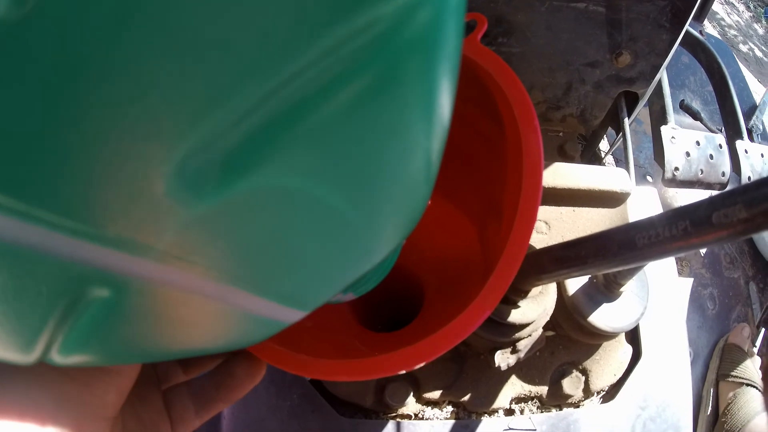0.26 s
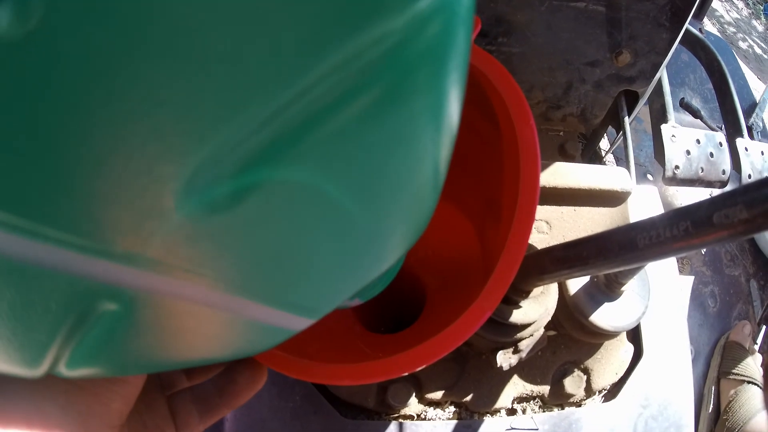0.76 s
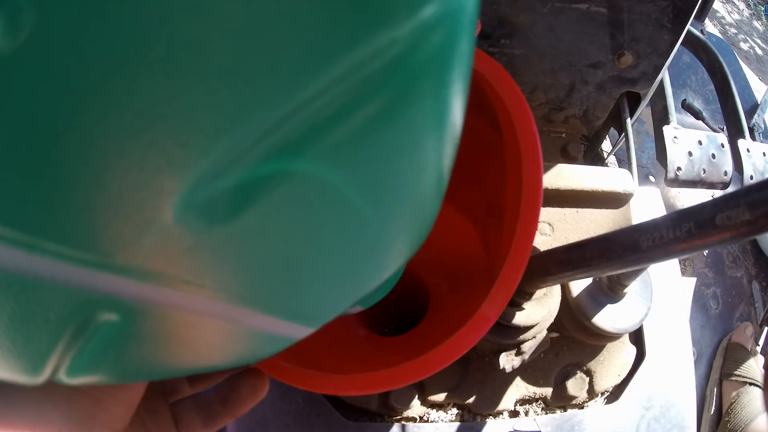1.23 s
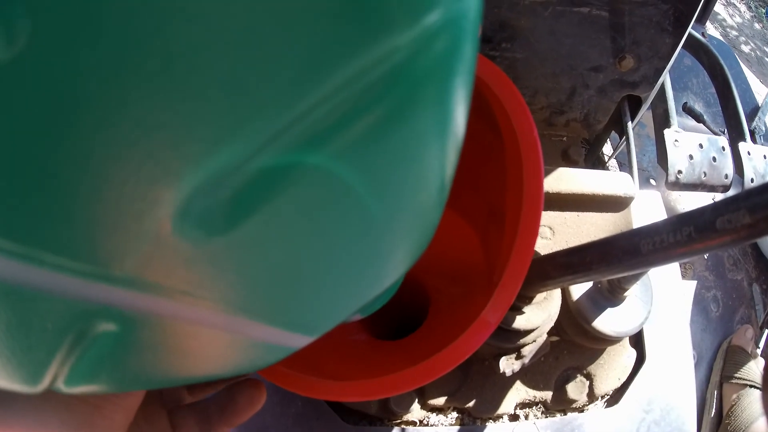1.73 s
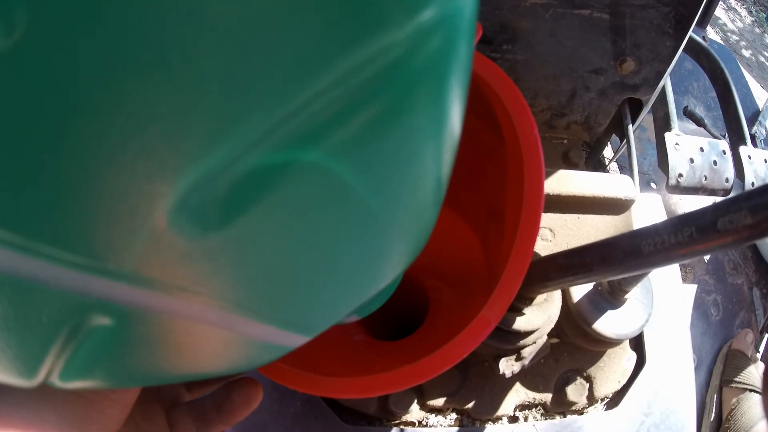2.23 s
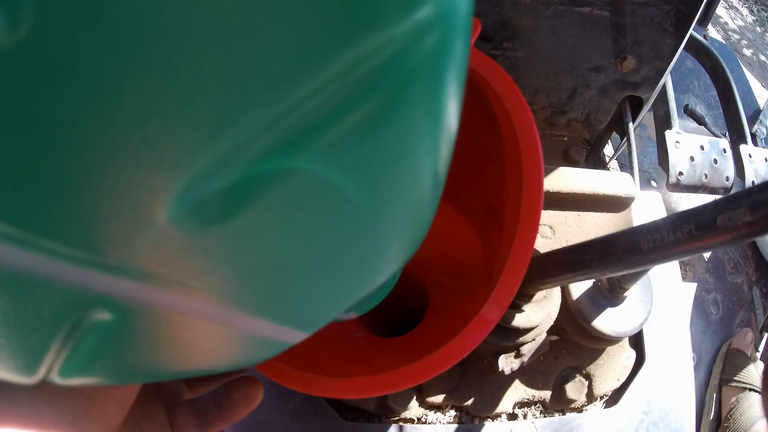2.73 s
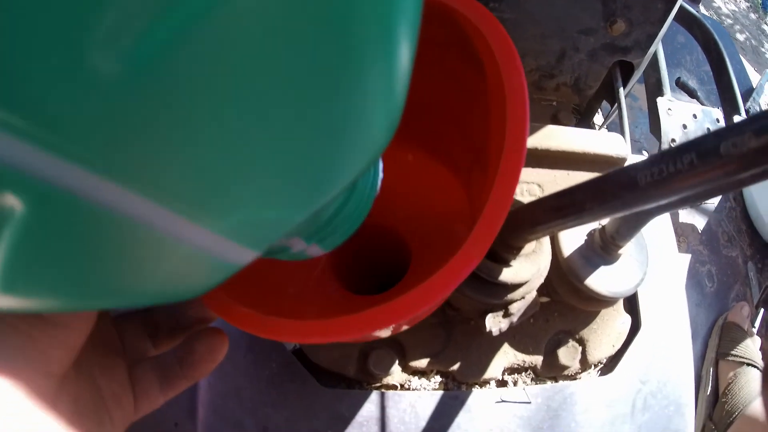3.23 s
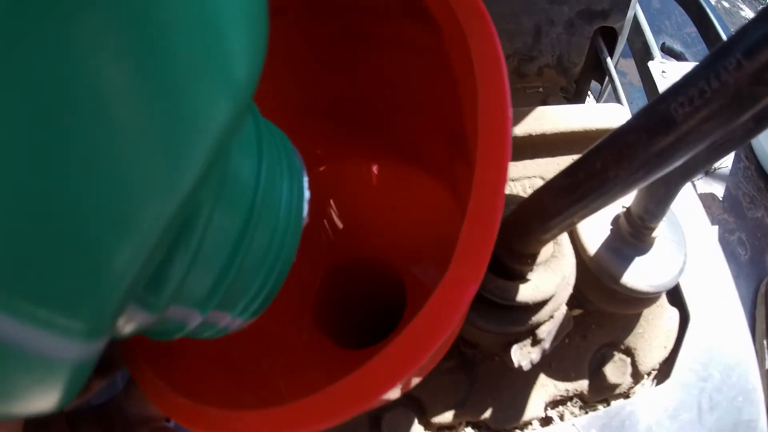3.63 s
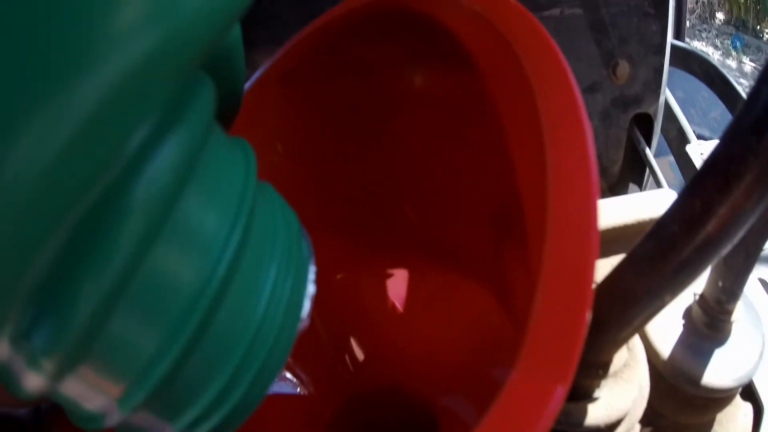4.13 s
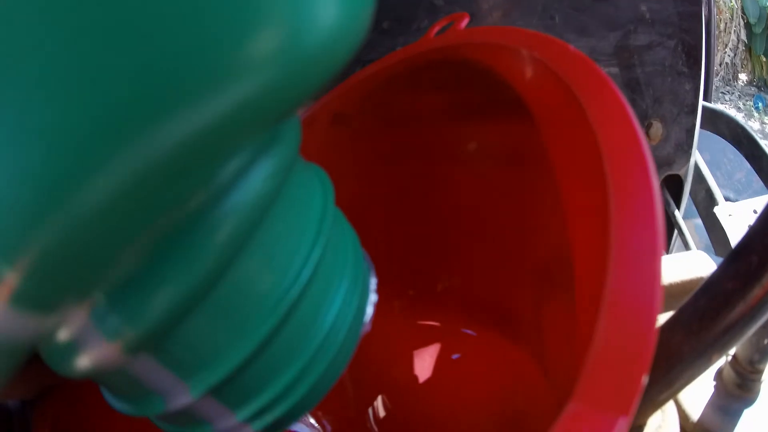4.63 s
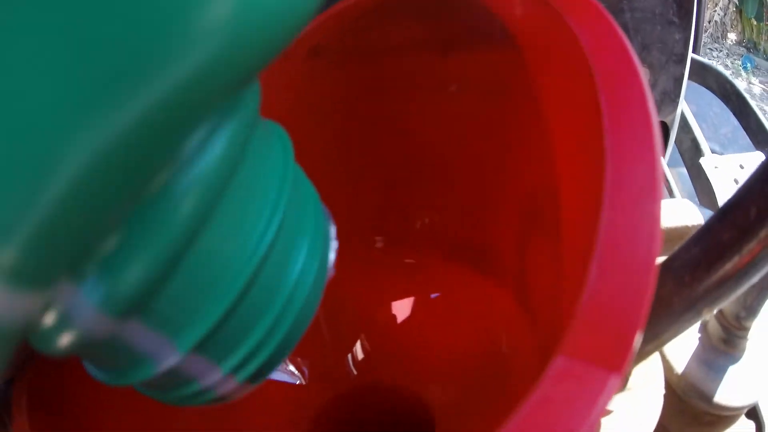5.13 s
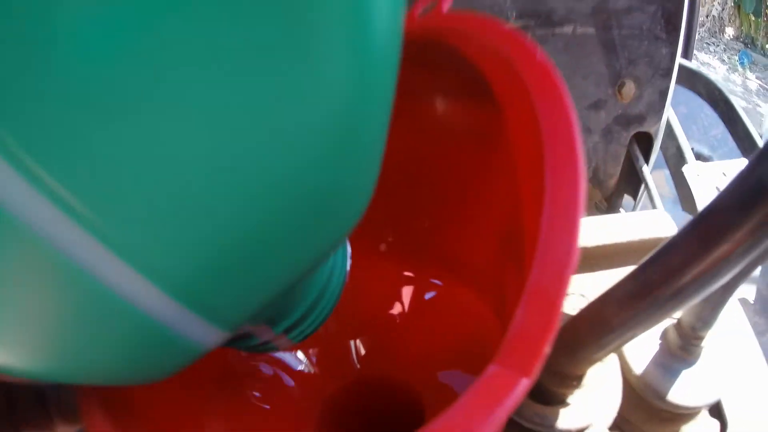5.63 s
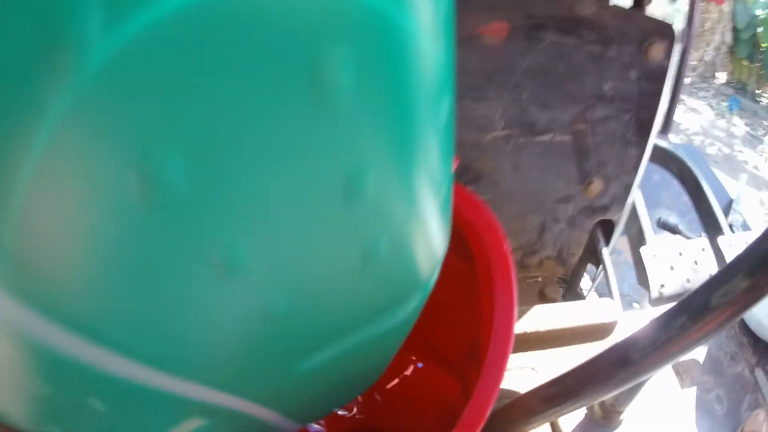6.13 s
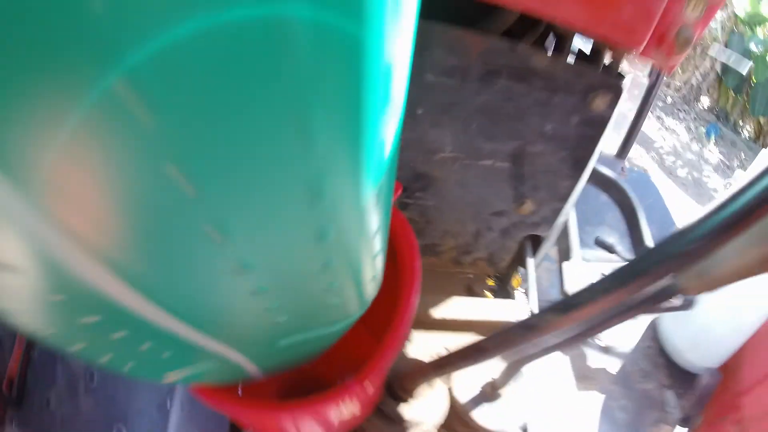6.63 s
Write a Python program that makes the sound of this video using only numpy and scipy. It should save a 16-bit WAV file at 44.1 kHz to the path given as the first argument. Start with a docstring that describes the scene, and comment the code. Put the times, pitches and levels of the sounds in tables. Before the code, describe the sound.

A plastic jug pops once, taps and rubs on a plastic funnel, then glugs oil and slides juddering along the rim.

```python
"""Outdoors at a farm machine, one microphone close by: oil is poured from a big plastic jug into a funnel.
The jug's wall pops once and rings. As the jug is tipped it bumps, taps and rubs on the plastic funnel,
ticks as it flexes and rumbles in the hands, and air glugs in at the neck.
At the end it clacks against the rim and slides along it with a hiss and a stick-slip judder.
Behind it all lie a faint rumble of open air, an even hiss and a thin whine that comes and goes."""
import sys
import numpy as np
from scipy import signal
from scipy.fft import rfft, irfft
from scipy.io import wavfile
from scipy.ndimage import uniform_filter1d

SR = 44100
rng = np.random.default_rng(int(sys.argv[2]) if len(sys.argv) > 2 else 0)


def to_wav(sig):
    """Store sig (one row per channel, or 1-D mono) as 16-bit WAV at the path in sys.argv[1].

    Samples outside -1..1 are clipped; the rate is SR.
    """
    pcm = np.clip(np.atleast_2d(sig), -1, 1) * 32767
    pcm = np.round(pcm).astype(np.int16)
    wavfile.write(sys.argv[1], SR, pcm.T)  # frames by channels


N = 302967
TIME = np.arange(N) / SR   # seconds into the scene
AGE = np.arange(SR) / SR   # seconds since a blow


def amp(db):
    """Decibels to gain."""
    return 10 ** (np.asarray(db) / 20)


def rms_one(x):
    """Scale to unit power."""
    return x / np.sqrt(np.mean(x ** 2) + 1e-20)


def peak_one(x):
    """Scale so that the loudest few milliseconds have unit power."""
    return x / np.sqrt(uniform_filter1d(x ** 2, size=256).max() + 1e-20)


def at_hz(table, hz, column=1):
    """Read a column of a table on a log-frequency axis."""
    table = np.array(table)
    return np.interp(np.log(hz + 1e-9), np.log(table[:, 0]), table[:, column])


def fade(t60):
    """An exponential decay that loses 60 dB in t60 seconds."""
    return np.exp(-np.log(1000) * AGE / max(t60, 1e-3))


def swell(rise_s):
    """A soft contact takes a moment to build up."""
    return 1 - np.exp(-(AGE / max(rise_s, 1e-4)) ** 2)


def add(track, s, sound):
    """Mix a sound into a track at a time in seconds."""
    at = int(round(s * SR))
    track[at:at + len(sound)] += sound[:N - at]


def drift(per_s):
    """A random wander of unit power."""
    knots = rng.standard_normal(int(N / SR * per_s) + 2)
    return rms_one(np.interp(TIME * per_s, np.arange(len(knots)), knots))


def coloured(x, spectrum):
    """Give a signal a spectrum that falls away beyond its ends; unit power."""
    hz = np.arange(len(x) // 2 + 1) * SR / len(x) + 1e-3
    ends = (1 + (spectrum[0][0] / hz) ** 8) * (1 + (hz / spectrum[-1][0]) ** 24)
    return rms_one(irfft(rfft(x) * amp(at_hz(spectrum, hz)) / np.sqrt(ends), len(x)))


def noise_burst(spectrum, t60, rise_s):
    """Coloured noise that builds up and dies away."""
    noise = coloured(rng.standard_normal(len(AGE)), spectrum)
    return peak_one(noise * fade(t60) * swell(rise_s))


def grains(per_s, spread_db):
    """Tiny catches of two surfaces, random in time and size."""
    sizes = amp(spread_db * np.minimum(rng.exponential(1, N), 4)) * rng.choice([-1, 1], N)
    return sizes * (rng.random(N) < per_s / SR)


def stroke(start, end, attack_s, release_s, growth_db_per_s):
    """The gain of one stroke: a soft attack, a hold that grows steadily, a dying release."""
    attack = 0.5 + 0.5 * np.tanh(2 * (TIME - start) / attack_s)
    release = np.exp(-np.maximum(TIME - end, 0) / release_s)
    from_middle_s = np.clip(TIME, start, end) - (start + end) / 2
    return attack * release * amp(growth_db_per_s * from_middle_s)


def favour_db(hz, centre_hz, slope_db):
    """The place and softness of a contact tilt the modes: slope_db less per octave from one pitch."""
    return -slope_db * np.abs(np.log2(hz / centre_hz))


def modal_ring(modes, vary_db, build_cycles):
    """Damped sines, varied on every blow; each builds up over its cycles, so the lows come last."""
    chance_db = rng.normal(0, vary_db, len(modes))
    out = 0
    for k, (hz, db, t60) in enumerate(modes):
        tone = (-1) ** k * amp(db + chance_db[k]) * np.sin(2 * np.pi * hz * AGE)
        out = out + tone * fade(t60) * swell(build_cycles / hz)
    return peak_one(out)


def dense_ring(table, centre_hz, slope_db):
    """Countless overlapping modes: half-octave bands of noise, each dying at its own rate."""
    edges_hz = np.geomspace(45, 17000, 18)
    white = rng.standard_normal((2, len(AGE)))
    out = 0
    for k, (low, high) in enumerate(zip(edges_hz, edges_hz[1:])):
        hz = np.sqrt(low * high)
        dying = white[k % 2] * fade(at_hz(table, hz, column=2))
        band = signal.sosfilt(signal.butter(2, [low, high], "band", fs=SR, output="sos"), dying)
        out = out + band * amp(at_hz(table, hz) + favour_db(hz, centre_hz, slope_db))
    return peak_one(out)


def blow(modes, ring, centre_hz, slope_db, dense_db, rise_s):
    """One blow on a plastic body: its clear modes and its dense ring."""
    struck = [(hz, db + favour_db(hz, centre_hz, slope_db), t60) for hz, db, t60 in modes]
    clear = modal_ring(struck, vary_db=3, build_cycles=0.88)
    dense = amp(dense_db) * dense_ring(ring, centre_hz, slope_db)
    return peak_one(swell(rise_s) * (clear + dense))


# Still air around the machine, and a fine hiss: (frequency [Hz], density [dB])
AIR_SPECTRUM = [(15, -31), (25, -12), (59, 2.5), (240, -6.5), (356, -7.5), (493, -13), (537, -15),
                (626, -12), (769, -16), (1500, -21.5), (1950, -35), (3300, -120)]
HISS_SPECTRUM = [(880, -27), (1500, -13), (1640, 0), (4230, -0.5), (6620, 0.5), (9420, -1.5), (11400, 2.5),
                 (12050, 2.5), (12280, 6), (12550, 0.5), (14000, -1.5), (16500, -7.5)]
def background():
    """A faint outdoor rumble under an even hiss."""
    air = amp(-54.5 + 0.12 * drift(per_s=13)) * coloured(rng.standard_normal(N), AIR_SPECTRUM)
    hiss = amp(-59) * coloured(rng.standard_normal(N), HISS_SPECTRUM)
    return air + hiss


# The oil-laden jug's clear modes: (frequency [Hz], level [dB], t60 [s])
LADEN_JUG_MODES = [(121, 12, 0.093), (176, 7, 0.38), (224.6, 0, 0.16), (318, -7, 0.056), (355.5, 1, 0.22),
                   (476, -5.5, 0.096), (546, -19, 0.24), (657, 5.5, 0.095), (736, 9, 0.034),
                   (910, -39, 0.042)]
# Its dense ring: (frequency [Hz], density [dB], t60 [s])
LADEN_JUG_RING = [(49.7, -15, 0.14), (105, 14, 0.054), (215, 8.5, 0.059), (507, -6.5, 0.18),
                  (794, -11, 0.13), (1100, -16.5, 0.075), (2000, -28, 0.064), (5000, -61, .04),
                  (14000, -28, .03)]
# Jug against funnel, close by: (time [s], level [dB], favoured pitch [Hz], weight [1 = a full bump])
JUG_BUMPS = [(0.047, -40, 108, 0.62), (1.553, -42.5, 138, 1.4), (3.046, -35, 487, 0.23),
             (3.050, -35.5, 30, 0.36), (4.129, -23, 240, 0.83), (4.162, -23, 480, 0.53),
             (4.171, -23, 423, 0.98), (4.234, -27, 523, 0.2), (4.274, -31, 300, 1.2),
             (5.110, -32.5, 350, 0.72), (5.189, -29.5, 199, 0.63), (5.272, -28.5, 269, 0.81),
             (5.961, -23, 510, 1.46), (6.031, -24.5, 478, 1.37), (6.087, -32.5, 350, 1.3),
             (6.301, -29.5, 443, 0.86)]
def bumps():
    """Dull bumps shake the jug; glancing ones ring shorter, weighty ones set the air inside booming."""
    cavity_hz = 65.13
    boom = np.sin(2 * np.pi * cavity_hz * AGE) * fade(t60=0.64) * swell(rise_s=0.015)
    out = np.zeros(N)
    for s, db, pitch_hz, weight in JUG_BUMPS:
        modes = [(hz, level_db, t60 * weight) for hz, level_db, t60 in LADEN_JUG_MODES]
        ring = [(hz, level_db, t60 * weight) for hz, level_db, t60 in LADEN_JUG_RING]
        knock = blow(modes, ring, pitch_hz, slope_db=4.5, dense_db=4, rise_s=0.0017)
        mouth_faces_microphone = 3.0 < s < 5.5
        boom_gain = amp(3 if mouth_faces_microphone else -19) * weight ** 1.96
        add(out, s, amp(db) * (knock + boom_gain * boom))
    return out


# The taut wall's clear modes: (frequency [Hz], level [dB], t60 [s])
TAUT_WALL_MODES = [(137, -10.5, 0.85), (172.7, 0, 0.52), (192, -6, 1), (267, 0, 0.13), (317, -9.5, 0.39),
                   (339, -15, 0.66), (416, -7, .35), (444, -7, 0.63), (516, -4, 0.24), (594, -9, 0.69),
                   (675, 5.5, 0.12), (705, -8.5, 0.64), (743, 6, 0.086), (1201, -12, 0.2), (1700, -19, 0.3),
                   (2450, -15.5, 0.21), (2820, -16.5, 0.15), (3408, -27, 0.2), (4110, -19, 0.13)]
# The dense ring between them: (frequency [Hz], density [dB], t60 [s])
TAUT_WALL_RING = [(60, -34, 0.54), (142, 2, 2.9), (250, -8.5, 0.56), (460, -3.5, 2.06), (696, -9, 2.1),
                  (900, -5.5, 0.21), (2020, -11, 0.19), (2950, -1.5, 0.053), (4970, -18, 0.094),
                  (14000, -19.5, 0.056)]
# The one pop, near the microphone: (time [s], level [dB])
WALL_POP = [(0.392, -18)]
def wall_pop():
    """The wall snaps through and the hollow jug rings on."""
    out = np.zeros(N)
    for s, db in WALL_POP:
        pop = blow(TAUT_WALL_MODES, TAUT_WALL_RING, 700, slope_db=-0.96, dense_db=-8, rise_s=0.00059)
        add(out, s, amp(db - 8) * pop)
    return out


# A faint whine in the background: (start [s], end [s], frequency [Hz], level [dB])
WHINE_TONES = [(0.56, 1.0, 5865, -66), (0.56, 1.0, 11050, -71), (1.0, 1.7, 4700, -72),
               (2.39, 2.61, 4700, -72), (4.08, 4.18, 5865, -67), (5.47, 5.8, 5865, -66),
               (5.47, 5.8, 11050, -71)]
def whine():
    """Thin steady tones switch on and off, barely above the hiss."""
    out = np.zeros(N)
    for start, end, hz, db in WHINE_TONES:
        gate = uniform_filter1d(1.0 * ((TIME > start) & (TIME < end)), size=1024)
        out += amp(db - 1) * np.sin(2 * np.pi * hz * TIME) * gate
    return out


# The plastic's modes under a light touch: (frequency [Hz], level [dB])
TOUCH_MODES = [(310, 9.5), (430, -6.5), (600, 1), (690, 3), (810, -6.5), (1010, -10), (1200, -12.5),
               (1500, -13), (2400, -23)]
# Neck and fingers tapping, close by: (time [s], level [dB], favoured pitch [Hz])
LIGHT_TAPS = [(0.915, -31, 675), (1.103, -35.5, 643), (1.302, -33, 393), (1.321, -33, 401),
              (1.412, -29, 680), (1.554, -32.5, 745), (1.749, -35.5, 678), (2.946, -36, 402),
              (3.075, -27, 420), (3.303, -33.5, 810), (3.352, -34.5, 430), (3.746, -26, 674),
              (3.894, -35.5, 689), (3.949, -23, 647), (4.275, -31, 700), (4.369, -32, 730),
              (4.765, -34, 704), (5.186, -20.5, 700)]
def taps():
    """Light, well damped touches, each with a short scuff in the contact."""
    usual_t60_s, usual_db, usual_hz = 0.056, -32.5, 680
    out = np.zeros(N)
    for s, db, pitch_hz in LIGHT_TAPS:
        # firmer touches, and softer, lower ones, damp the ring sooner
        t60 = usual_t60_s * amp(usual_db - db) ** 0.51 * (pitch_hz / usual_hz) ** 2
        favoured = [(hz, level + favour_db(hz, pitch_hz, slope_db=7.5)) for hz, level in TOUCH_MODES]
        ring = modal_ring([(hz, level, t60) for hz, level in favoured], vary_db=5.5, build_cycles=1.25)
        scuff = noise_burst(favoured, t60, rise_s=0.0017)
        add(out, s, amp(db - 11.5) * peak_one(ring + amp(0.5) * scuff))
    return out


# A tick's bright colour at close range: (frequency [Hz], density [dB])
TICK_SPECTRUM = [(1200, -6), (3000, -2), (5500, -1), (9000, -2), (12500, 0), (16500, 0)]
# Ticks of the flexing plastic: (time [s], level [dB], t60 [s])
FLEX_TICKS = [(1.738, -53.5, .04), (3.045, -53, .022), (3.497, -44, .007), (3.590, -53, .01),
              (3.620, -44, .005), (3.646, -52, .008), (3.714, -41, .013), (3.739, -50, .015),
              (3.895, -51, .006), (3.949, -50, .02), (4.008, -45.5, .007), (4.038, -46.5, .012),
              (4.138, -48, .012), (4.208, -49, .025), (4.234, -42, .012), (4.248, -50, .025),
              (4.371, -47, .005), (4.445, -48, .012), (5.184, -44, .025), (5.267, -43, .03),
              (5.671, -48.5, .025), (5.968, -45.5, .022), (6.030, -30, .04)]
def ticks():
    """Stressed plastic gives way in tiny bright cracks; the longer ones build up more slowly."""
    out = np.zeros(N)
    for s, db, t60 in FLEX_TICKS:
        add(out, s, amp(db) * noise_burst(TICK_SPECTRUM, t60, rise_s=2.5 * t60 ** 2))
    return out


# The jug's rumble in the hands, close by: (frequency [Hz], density [dB])
HANDLING_SPECTRUM = [(35, -5), (65, 1.5), (130, 9), (200, 1.5), (400, 0.5), (650, 0.5), (900, -9),
                     (1500, -19.5), (3000, -21.5)]
# Shifts of the hands, each at the height of the move: (time [s], level [dB])
HAND_SHIFTS = [(3.72, -43), (4.2, -37.5), (5.27, -34), (5.72, -42), (6.25, -33.5), (6.63, -29.5)]
def handling():
    """Each shift of the hands on the heavy jug swells and dies away with a lumpy rumble."""
    rise_db_per_s, fall_db_per_s = 36, 41
    shifts_db = [db - np.maximum(rise_db_per_s * (s - TIME), fall_db_per_s * (TIME - s))
                 for s, db in HAND_SHIFTS]
    rumble = coloured(rng.standard_normal(N), HANDLING_SPECTRUM)
    return amp(np.max(shifts_db, axis=0) + 1.8 * drift(per_s=11) - 8) * rumble


# Plastic sliding on plastic, at the funnel: (frequency [Hz], density [dB])
FRICTION_SPECTRUM = [(900, -7.5), (1800, -16.5), (2800, -12), (5000, -8), (7500, -10), (10000, -6.5),
                     (12500, -3.5), (14000, -6.5), (15500, -11.5)]
def sliding_hiss():
    """The countless fine catches of smooth plastic merge into a flickering hiss."""
    flicker = amp(0.96 * drift(per_s=92))
    return flicker * coloured(grains(per_s=12000, spread_db=1.5), FRICTION_SPECTRUM)


# The funnel's resonances under the neck: (frequency [Hz], width [Hz], level [dB])
FUNNEL_RESONANCES = [(671, 84, 0.8), (713, 84, -0.5), (800, 22, -2.5)]
def funnel_singing():
    """Dense catches of the neck sing in the funnel's resonances, at a wavering level."""
    catches = grains(per_s=800, spread_db=3)
    ringing = 0
    for k, (hz, width_hz, db) in enumerate(FUNNEL_RESONANCES):
        resonance = signal.lfilter(*signal.iirpeak(hz, hz / width_hz, fs=SR), catches)
        ringing = ringing + (-1) ** k * amp(db) * resonance
    damped = signal.sosfilt(signal.butter(4, 900, fs=SR, output="sos"), ringing)
    even = damped / np.sqrt(uniform_filter1d(damped ** 2, size=1500) + 1e-12)
    return amp(1.5 * drift(per_s=29) - 2) * even


# The neck's thread rasping on the rim: (frequency [Hz], density [dB])
THREAD_SPECTRUM = [(1000, -16), (1500, -3), (2350, -1), (2680, 10), (2950, 1), (3400, 6), (4200, -2),
                   (5000, 3), (6500, -8), (9000, -2)]
# Strokes of the neck in the funnel: (start [s], end [s], singing [dB], hiss [dB], rasp [dB])
NECK_RUBS = [(4.107, 4.269, -43.5, -60, -54.5), (4.366, 4.80, -54, -64, -75),
             (4.817, 4.93, -51, -59.5, -78), (4.934, 5.06, -48, -56.5, -77),
             (5.081, 5.113, -28.5, -48.5, -51), (5.252, 5.271, -31, -47, -58),
             (5.30, 5.378, -43, -51.5, -51.5), (5.395, 5.456, -43, -46, -51)]
def neck_rub():
    """The neck bears down harder through each stroke: the funnel sings and hisses, the thread rasps."""
    gains = 0
    for start, end, *levels_db in NECK_RUBS:
        pressure = stroke(start, end, attack_s=0.028, release_s=0.026, growth_db_per_s=5)
        gains = gains + np.outer(amp(levels_db), pressure)
    sing_gain, hiss_gain, rasp_gain = gains
    singing = funnel_singing()
    rasp = amp(-2.5) * coloured(grains(per_s=890, spread_db=2), THREAD_SPECTRUM)
    hiss = amp(-1) * sliding_hiss()
    return sing_gain * singing + hiss_gain * hiss + rasp_gain * rasp


# Air gulped in at the neck, close by: (time [s], level [dB], bubble pitch [Hz])
AIR_GULPS = [(5.669, -29, 660), (5.671, -21.5, 315.5), (5.683, -22.5, 170), (5.688, -28.5, 120),
             (5.968, -12.5, 172.2), (5.972, -21.5, 120), (6.313, -35.5, 114), (6.669, -25, 320),
             (6.692, -26.5, 316)]
def glugs():
    """Each gulp of air rings for the same number of cycles in the thick oil, rising slightly in pitch."""
    ring_cycles, swell_cycles, pitch_rise = 30, 0.9, 0.038
    out = np.zeros(N)
    for s, db, pitch_hz in AIR_GULPS:
        dying = fade(ring_cycles / pitch_hz)
        hz = pitch_hz * (1 + pitch_rise * (1 - dying))
        bubble = np.sin(2 * np.pi * np.cumsum(hz) / SR) * dying * swell(swell_cycles / pitch_hz)
        add(out, s, amp(db - 1.5) * peak_one(bubble))
    return out


# The treble that a fast slide adds: (frequency [Hz], density [dB])
SWISH_SPECTRUM = [(8000, -13.5), (10500, -9.5), (12500, -2.5), (14200, -7), (15500, -11)]
# Strokes of the jug's side along the rim: (start [s], end [s], level [dB])
RIM_SLIDES = [(6.004, 6.324, -46.5), (6.367, 6.515, -48), (6.481, 6.663, -39.5), (6.716, 6.853, -49)]
def rim_slide():
    """The jug's smooth side hisses along the rim, gathering speed, with a bright swish where fastest."""
    swish_from_db, swish_range_db = -46.5, 9.5
    gain = sum(amp(db) * stroke(start, end, attack_s=0.039, release_s=0.043, growth_db_per_s=22.5)
               for start, end, db in RIM_SLIDES)
    level_db = 20 * np.log10(gain + 1e-9)
    speed = np.clip((level_db - swish_from_db) / swish_range_db, 0, 1)   # 0 a slow creep, 1 full speed
    flicker = amp(drift(per_s=110) + 5)
    swish = flicker * speed * coloured(grains(per_s=5400, spread_db=-3), SWISH_SPECTRUM)
    return gain * (amp(-2.5) * sliding_hiss() + swish)


# The clear modes of the funnel's rim: (frequency [Hz], level [dB], t60 [s])
FUNNEL_RIM_MODES = [(512, 14, 0.1), (747, -6, 0.19), (986, 11.5, 0.051), (1070, 4, 0.039),
                    (1205, -4.5, 0.23), (1684, -7, 0.28), (1780, 4.5, 0.035), (2390, 2, 0.051),
                    (2890, 0, 0.042), (3220, 7, 0.035), (3650, -6, 0.09), (4270, 4.5, 0.04),
                    (7040, -11, .045), (8600, -16, 0.036)]
# Its dense ring: (frequency [Hz], density [dB], t60 [s])
FUNNEL_RIM_RING = [(200, -7, 0.33), (448, 11.5, 0.17), (1130, -1, 0.14), (1800, -3.5, 0.11),
                   (3230, -14, 0.22), (5330, -13, 0.036), (7800, 16.5, 0.027), (13900, 1.5, 0.036)]
# The jug striking the rim, close by: (time [s], level [dB], favoured pitch [Hz])
RIM_CLACKS = [(6.029, -30, 3030), (6.17, -29.5, 1180), (6.222, -28, 1260)]
def clacks():
    """Hard contacts ring the funnel's rim."""
    out = np.zeros(N)
    for s, db, pitch_hz in RIM_CLACKS:
        clack = blow(FUNNEL_RIM_MODES, FUNNEL_RIM_RING, pitch_hz, slope_db=6, dense_db=-1.5, rise_s=0.002)
        add(out, s, amp(db) * clack)
    return out


# The funnel's modes under a slip: (frequency [Hz], level [dB], t60 [s])
JUDDER_MODES = [(588, 6, 0.078), (627, -0.5, 0.18), (693, -7.5, 0.19), (780, -5.5, 0.068),
                (1010, -9, 0.092), (1178, -11, 0.1), (1280, 1, 0.022), (1670, -6, 0.025)]
# The scuff of a slip: (frequency [Hz], density [dB])
SCUFF_SPECTRUM = [(250, 2.5), (650, -4), (900, -7), (1300, -9.5), (2000, -27), (3500, -15.5)]
# Slips of the jug along the rim: (time [s], level [dB])
RIM_SLIPS = [(6.428, -24), (6.443, -24), (6.478, -28.5), (6.523, -23), (6.56, -21), (6.591, -24.5),
             (6.626, -23), (6.644, -27.5), (6.764, -26.5), (6.796, -24)]
def judder():
    """The jug sticks and slips; each slip scuffs and rings the funnel, retuned by the shifting load."""
    out = np.zeros(N)
    for s, db in RIM_SLIPS:
        retune = 1 + 0.039 * np.clip(rng.standard_normal(), -1, 1)
        modes = [(hz * retune, level_db, t60) for hz, level_db, t60 in JUDDER_MODES]
        scuff = noise_burst(SCUFF_SPECTRUM, t60=0.077, rise_s=0.00033)
        ring = modal_ring(modes, vary_db=2, build_cycles=1.3)
        add(out, s, amp(db - 9.5) * (ring + amp(-4.5) * scuff))
    return out


def scene():
    """Jug and funnel in the open air, close to one microphone."""
    mix = background() + bumps() + wall_pop() + whine() + taps() + ticks() + handling()
    mix += neck_rub() + glugs() + rim_slide() + clacks() + judder()
    return mix[None]


def record(dry):
    """The top is cut steeply."""
    cutoff_hz = 15450
    return signal.sosfilt(signal.ellip(12, 0.1, 90, cutoff_hz, fs=SR, output="sos"), dry)


dry = scene()
out = record(dry)
to_wav(out)
```